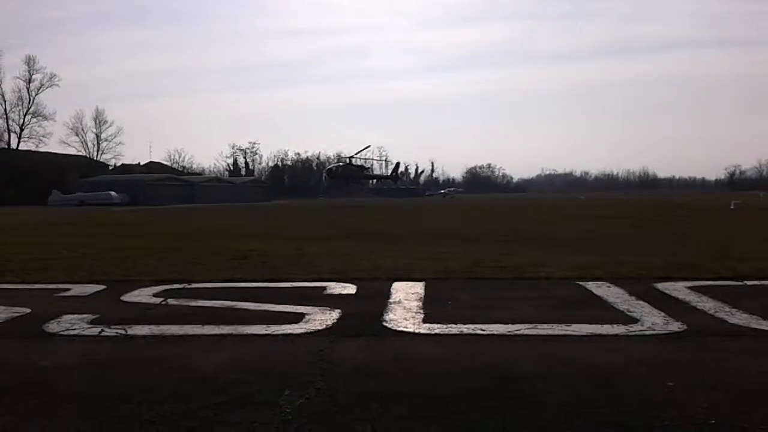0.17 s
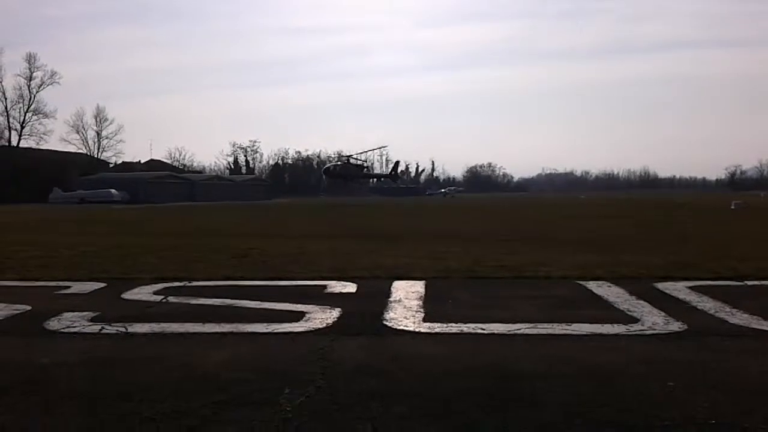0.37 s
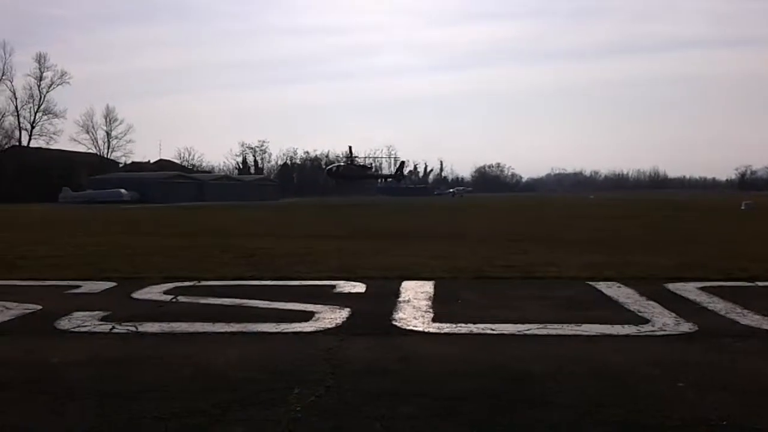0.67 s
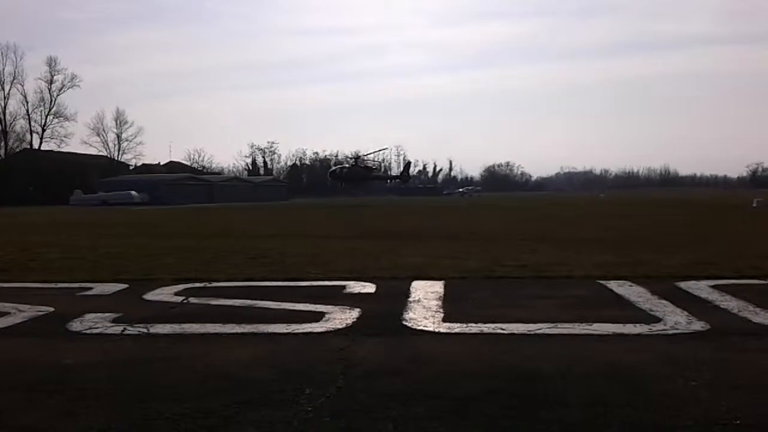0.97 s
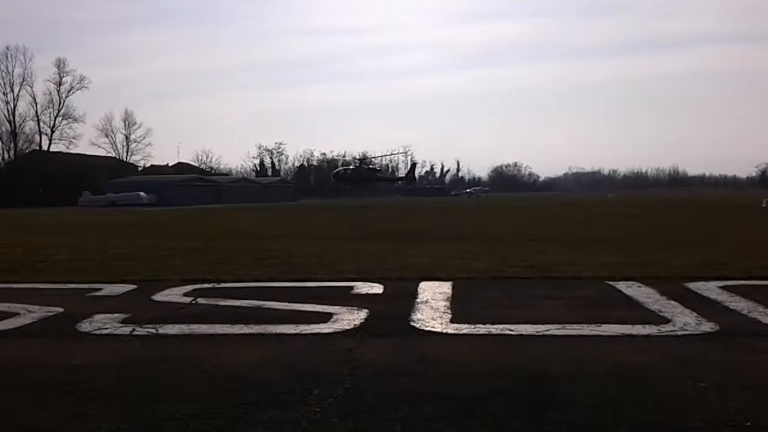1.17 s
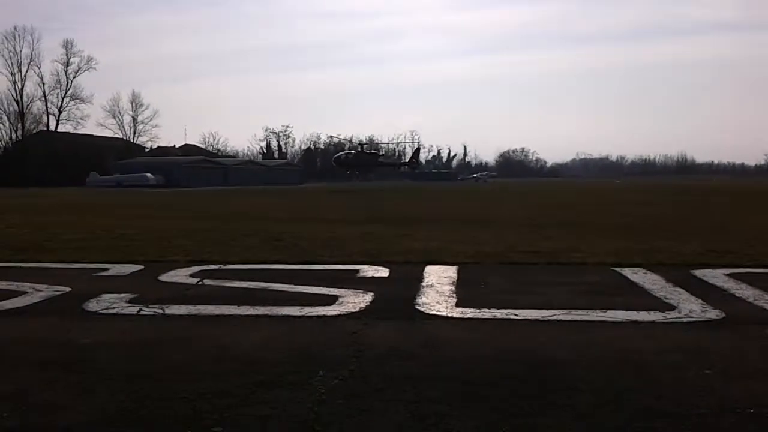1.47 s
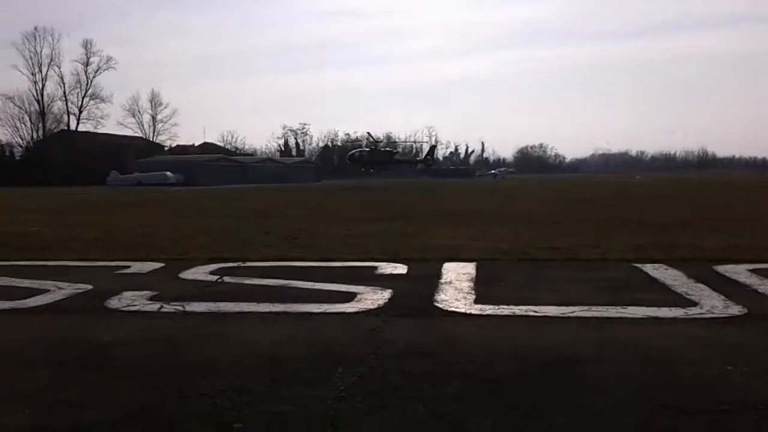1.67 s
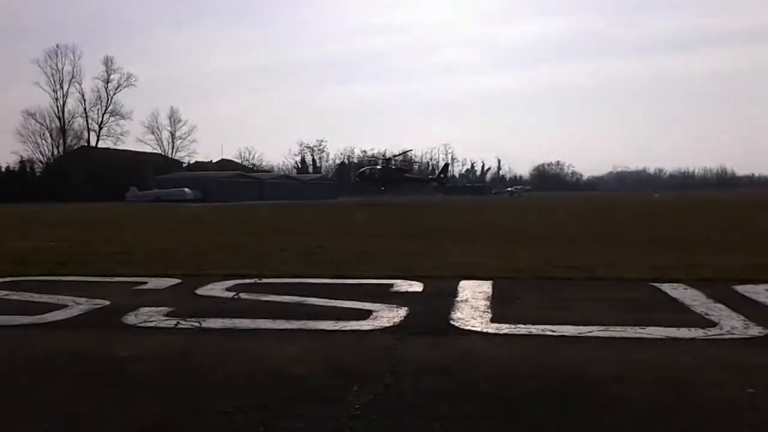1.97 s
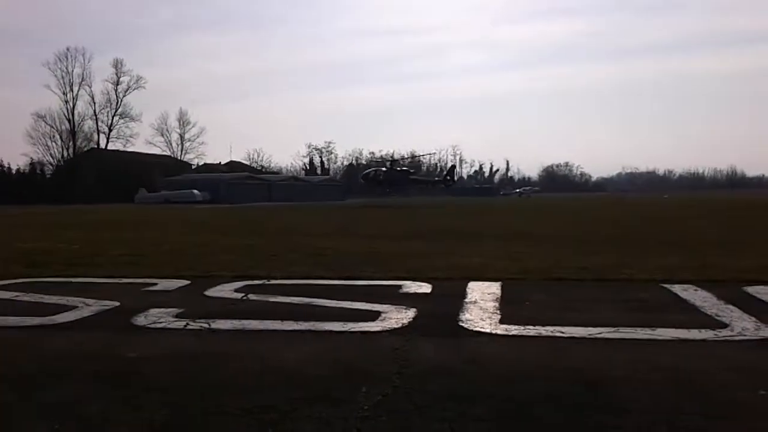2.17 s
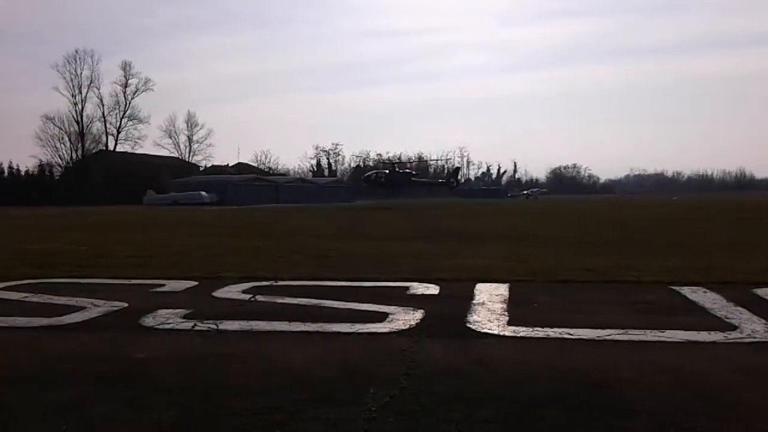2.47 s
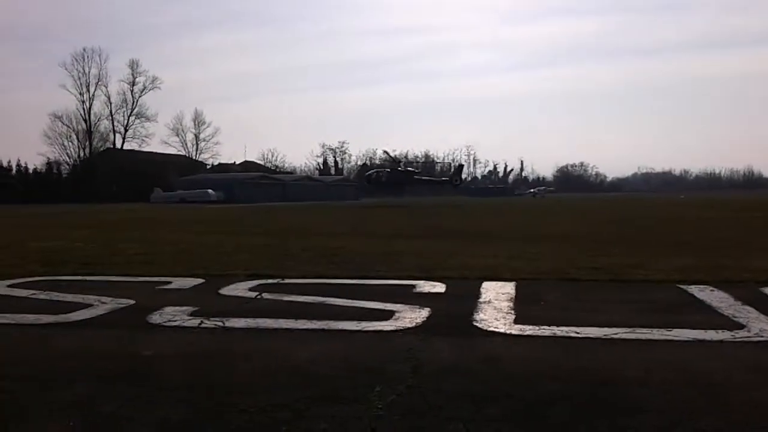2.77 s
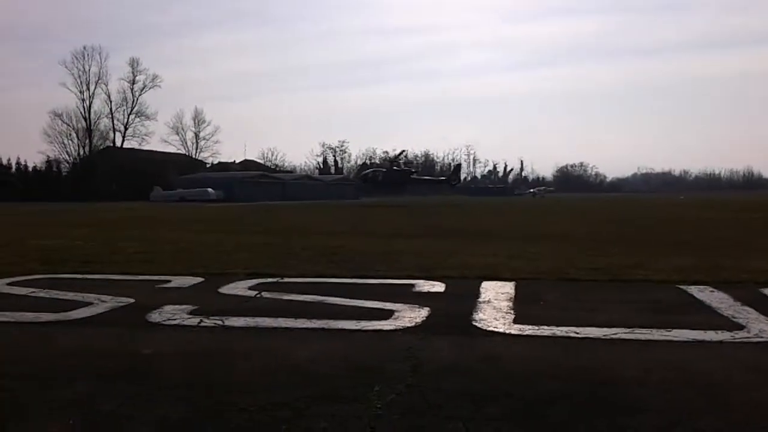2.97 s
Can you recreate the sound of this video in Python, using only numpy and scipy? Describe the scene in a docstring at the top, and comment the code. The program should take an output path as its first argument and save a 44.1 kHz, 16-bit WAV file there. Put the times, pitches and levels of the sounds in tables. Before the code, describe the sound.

A helicopter hovers some way off across an open airfield for about three seconds. A loud, very high turbine whistle flutters throughout, peaking near 1.3 seconds. Beneath it the blades slap and thump rapidly, about twenty times a second, over a steady raspy exhaust roar. Sharper blade cracks come in the first half second, near 1 second and from 2 to 2.4 seconds. The whistle weakens near the end as hiss rises.

```python
"""An open airfield, with a light turbine helicopter hovering low some way off.
The engine's compressor whistles loudly. Air blown down by the rotor makes the whistle flutter,
and the passing blades throw it back at a higher pitch. Each blade thumps, swishes and slaps
through the swirls of air left by the blades before it, over the roar of the exhaust."""
import sys
import numpy as np
from scipy import signal
from scipy.fft import rfft, irfft, next_fast_len
from scipy.io import wavfile
from scipy.ndimage import uniform_filter1d

SR = 44100
rng = np.random.default_rng(int(sys.argv[2]) if len(sys.argv) > 2 else 0)


def generate_wav(signal):
    """Clip the signal to [-1, 1] and save it as 16-bit WAV at the path in sys.argv[1]."""
    frames = np.transpose(np.atleast_2d(signal))
    scaled = np.clip(frames, -1, 1) * 32767
    pcm = np.round(scaled).astype(np.int16)
    wavfile.write(sys.argv[1], SR, pcm)


N = 137151
TIME = np.arange(N) / SR
BLADE_HZ, FIRST_PASS_S = 19.4, .013
BLADE_TIMES = FIRST_PASS_S + np.arange(int(N / SR * BLADE_HZ) + 1) / BLADE_HZ  # when a blade comes round


# Each row: time in seconds, pitch in Hz.
WHISTLE_PITCH = [(0, 7863), (1.0, 7858), (1.7, 7848), (2.45, 7839), (3.11, 7847)]
def compressor_phase():
    """The spinning compressor sets the whistle's phase (its place in the wave); the pitch wavers."""
    return 2 * np.pi * np.cumsum(curve(WHISTLE_PITCH) + 11 * wander(rate_hz=20)) / SR


# Each row: time in seconds, relative level in dB.
WHISTLE_LEVEL = [(0.0, -7.5), (0.03, -14.5), (0.1, -24), (0.12, -17), (0.16, -7), (0.23, -25), (0.27, -9.5),
                 (0.58, -19), (0.62, -4.5), (0.65, -11), (0.68, -9), (0.73, -19.5), (0.84, -17),
                 (0.89, -11.5), (1.05, -16.5), (1.09, -10.5), (1.12, -22.5), (1.19, -13), (1.21, -33),
                 (1.26, -7.5), (1.3, -25.5), (1.32, -3), (1.32, 3), (1.34, -28), (1.37, -15), (1.49, -10.5),
                 (1.59, -16), (1.62, -9), (1.64, -24), (1.68, -5), (1.71, -24), (1.73, -5), (1.78, -28),
                 (1.84, -6), (1.92, -22.5), (1.94, -31), (1.96, -19), (1.99, -29), (2.07, -12.5),
                 (2.23, -15), (2.33, -36), (2.35, -19), (2.41, -7.5), (2.43, -20), (2.53, -8.5),
                 (2.61, -17), (2.62, -10), (2.64, -29), (2.7, -9), (2.8, -27), (2.82, -9), (2.91, -34),
                 (2.96, -45), (2.99, -17), (3.09, -56)]
def whistle(phase):
    """The compressor's note and a faint octave above it flutter in the air the rotor blows down."""
    level_db = curve(WHISTLE_LEVEL)
    note = fluttering_tone(phase, rate_hz=32.2, depth=.39) * undb(level_db - .2)
    octave = fluttering_tone(2 * phase, rate_hz=32.2, depth=.9) * undb(level_db - 34)
    return note + octave


# Each row: frequency in Hz, relative level in dB.
SCATTER_COLOUR = [(7000, -24), (7450, -21.5), (7730, -19), (7850, 8), (8000, -8.5), (8150, -13),
                  (8400, -20), (9000, -38.5)]
def scattered_whistle():
    """Part of the whistle is scattered into a narrow hiss around its pitch."""
    return noise(SCATTER_COLOUR) * undb(-19 + 2 * wander(14))


# Each row: frequency in Hz, relative level in dB.
ECHO_COLOUR = [(7600, -43), (7950, 9), (8100, 1), (8300, -9), (8600, -16), (9000, -19.5), (9500, -34),
               (10300, -65)]
def blade_echoes():
    """Each moving blade throws the whistle back as a short, higher hiss."""
    return noise(ECHO_COLOUR) * blade_swell(delay_s=.021, width_s=.0037) * undb(-26)


# Runs of slaps, one slap per blade. Each row: start and end in seconds, first and last delay after
# the blade in milliseconds, ring level in dB, body level in dB, body pitch in Hz, crackle level in dB.
SLAP_RUNS = [(-.05, 0.273, 2.5, -1.5, -23.5, -24, 380, -23.5), (-.05, 0.183, 12.5, 13, -24, -26, 336, -36),
             (.3, 0.718, -0.5, -1.5, -26, -26.5, 378, -25.5), (0.503, 0.982, 6, 1, -18.5, -16, 340, -23.5),
             (0.937, 1.371, -0.5, -4.5, -14.5, -25, 258, -23),
             (0.485, 0.942, 13.5, 10, -25, -19.5, 229, -28),
             (1.02, 1.363, 11.5, 7.5, -23.5, -25.5, 206, -36), (1.33, 1.606, 10, 7, -34, -18, 288, -44),
             (1.666, 1.86, 5.5, 8, -29, -18.5, 250, -47), (1.9, 2.27, 4.5, 5, -18.5, -18, 360, -21.5),
             (2.26, 2.44, 3.5, 4, -21.5, -24, 360, -21.5), (2.405, 3.144, 8, 5, -21.5, -21, 382, -28),
             (2.568, 3.162, -10, -17, -26, -28, 296, -36), (2.66, 3.096, 19, 13.5, -22, -21, 340, -30)]
# The knocks carry little bass. Each row: frequency in Hz, gain in dB.
KNOCK_BASS_CUT = [(30, -28.5), (90, -7), (170, -3), (3000, -1.5)]
# The tone of crackles and cracks. Each row: frequency in Hz, relative level in dB.
CRACK_COLOUR = [(150, -14), (500, -7), (850, -3), (1300, -1.5), (2500, -6.5), (4200, 3.5), (6000, -12),
                (10000, -43)]
def blade_slaps():
    """A blade cuts swirls of air: a ring, a low body and a crackle, sliding in time as the air shifts."""
    knocks, crackle_level = np.zeros(N), np.zeros(N)
    for start, end, first_ms, last_ms, ring_db, body_db, body_hz, crackle_db in SLAP_RUNS:
        for when, chance in zip(BLADE_TIMES, rng.standard_normal((len(BLADE_TIMES), 4))):
            progress = (when - start) / (end - start)
            if 0 < progress < 1:
                centre = when + (first_ms + progress * (last_ms - first_ms)) / 1000
                near = slice(*np.searchsorted(TIME, [centre - 1 / BLADE_HZ, centre + 1 / BLADE_HZ]))
                age = TIME[near] - centre
                size = np.sin(np.pi * progress) ** .28 * undb(2 * chance[0])  # each run swells and fades
                ring = np.sin(2 * np.pi * 590 * (1 + .028 * chance[1]) * age)
                ring *= burst(age, rise_s=.0022, fall_s=.0033)
                body = np.cos(2 * np.pi * body_hz * (1 + .16 * chance[2]) * age)
                body *= burst(age, rise_s=.002, fall_s=.0022)
                knocks[near] += size * (undb(ring_db) * ring + undb(body_db) * body)
                crackle = burst(age, rise_s=.0008, fall_s=.003)
                crackle_level[near] += size * undb(crackle_db + 2 * chance[3]) * crackle
    return colour(knocks, KNOCK_BASS_CUT) + crackle_level * noise(CRACK_COLOUR)


# Each row: time in seconds, relative strength in dB.
HARD_STRIKES = [(0.0613, -7.5), (0.0722, -14), (0.166, -12), (0.2198, -8.5), (0.4813, -11), (0.631, -22),
                (1.0485, -6.5), (1.5654, -12), (2.0274, -15), (2.1314, -22), (2.1821, -11), (2.236, -12.5),
                (2.2844, -18), (2.335, -10), (2.387, -15.5)]
def blade_cracks(fall_s=.0065):
    """The hardest strikes on the swirling air snap, each with a short noisy tail."""
    when, db = np.array(HARD_STRIKES).T
    snaps = clicks(when, undb(db + 3.5))
    fade = signal.lfilter([1], [1, -np.exp(-1 / (fall_s * SR))], snaps)
    tail = .11 * fade * rng.standard_normal(N)
    return colour(3 * (snaps + tail), CRACK_COLOUR)


# Each row: frequency in Hz, relative level in dB.
THUD_COLOUR = [(30, -33.5), (60, -19), (100, -3), (190, -0.5), (350, 2.5), (600, -7), (850, -2),
               (2000, -42)]
def wake_thuds(swirls=24):
    """Every blade meets nearly the same slowly drifting swirls, so a low thud repeats."""
    at = np.minimum((BLADE_TIMES * SR).astype(int), N - 1)
    hits = np.zeros(N)
    for _ in range(swirls):
        delay_s = .00899 + .00789 * rng.standard_normal() + .00062 * wander(.84)[at]
        hits += clicks(BLADE_TIMES + delay_s, sizes=wander(2.35)[at])
    return undb(-37) * unit(colour(hits, THUD_COLOUR))


# Each row: frequency in Hz, relative level in dB.
SWISH_COLOUR = [(60, -26), (200, -4.5), (600, 3), (850, -11.5), (1200, -2), (2200, -1.5), (4000, 3),
                (6000, -11), (10000, -43)]
def blade_swish():
    """Air tears off each blade as it swings forward."""
    swishes = noise(SWISH_COLOUR) * blade_swell(delay_s=.0081, width_s=.0069)
    return swishes * undb(-40 + 2.53 * wander(5.3))


# Each row: frequency in Hz, relative level in dB.
THUMP_COLOUR = [(20, -28), (38, -16.5), (60, -16.5), (100, 3.5), (160, 4.5), (260, -24)]
def blade_thump():
    """Each blade's lift pushes on the air with a soft, low pulse."""
    pulses = clicks(BLADE_TIMES + .009, np.ones(len(BLADE_TIMES)))
    return undb(-53) * unit(colour(pulses, THUMP_COLOUR))


# The tone of each engine noise. Each row: frequency in Hz, relative level in dB.
ROAR_COLOUR = [(25, -24.5), (60, -8.5), (100, -0.5), (180, 2.5), (380, -5), (650, -3), (880, -16.5),
               (1100, -6.5), (1500, -13), (1800, -6.5), (2100, -10), (2600, -4.5), (3200, -6.5), (4000, -8),
               (5100, -13), (5800, -15.5), (6600, -32.5)]
RASP_COLOUR = [(2500, -16), (3400, -13.5), (3850, 2.5), (4050, -2.5), (4350, -2), (4700, -6.5),
               (5250, -7.5), (5700, -21)]
HISS_COLOUR = [(4500, -17.5), (6000, -13.5), (7000, -3.5), (8800, 1.5), (10000, -9.5), (11600, -19),
               (13000, -15), (14500, -8), (15600, -1), (16000, -27.5)]
# How the roar, rasp and hiss swell and fade, rising where the whistle weakens.
# Each row: time in seconds, relative level in dB.
ROAR_LEVEL = [(0, -36), (.67, -35), (1.48, -39), (1.8, -37.5), (1.95, -32.5), (2.09, -36.5), (2.31, -39.5),
              (2.62, -37), (2.92, -35.5), (3.11, -32)]
RASP_LEVEL = [(0, -31.5), (.3, -31.5), (.6, -30.5), (.77, -25.5), (.95, -31), (1.3, -32), (1.55, -33),
              (1.8, -32), (1.97, -26.5), (2.15, -30), (2.52, -34), (2.85, -27), (3.11, -29)]
HISS_LEVEL = [(0, -51), (.7, -52), (2.7, -56.5), (2.78, -51), (3.11, -46)]
def exhaust_and_intake():
    """Gas leaves the exhaust pipe with a roar and a bright rasp, while the air intake hisses."""
    roar = noise(ROAR_COLOUR) * undb(curve(ROAR_LEVEL) + 3 + 1.2 * wander(25))
    rasp = noise(RASP_COLOUR) * undb(curve(RASP_LEVEL) - .5 + wander(17))
    hiss = noise(HISS_COLOUR) * undb(curve(HISS_LEVEL) + 11.5 + .8 * wander(15))
    return roar + rasp + hiss


# Each row: multiple of the shaft's turning rate, level in dB.
SHAFT_TONES = [(5, -43.5), (7, -43.5), (8, -52.5), (9, -57), (10, -44), (12, -56), (13, -54), (14, -51),
               (16, -69)]
# Each row: pitch in Hz, level in dB.
GEAR_TONES = [(1281, -50), (1705, -55), (2562, -56), (2853, -49.5), (3844, -51.5)]
def shaft_and_gears(phase, compressor_blades=11):
    """The engine shaft, which turns with the compressor, and the gearbox add faint tones."""
    tones = [(multiple * phase / compressor_blades, db) for multiple, db in SHAFT_TONES]
    tones += [(2 * np.pi * hz * TIME, db) for hz, db in GEAR_TONES]
    return sum(undb(db) * fluttering_tone(angle, rate_hz=6, depth=.6) for angle, db in tones)


# Each row: frequency in Hz, gain in dB.
GROUND_DIPS = [(20, -1), (720, 0), (800, 0), (870, -10), (980, 0), (5300, 0), (5850, -4), (6300, -1),
               (6900, -11), (7500, 1), (16000, 1)]
def ground_bounce(sound):
    """Sound bouncing off the ground cancels some frequencies of the direct sound."""
    return colour(sound, GROUND_DIPS)


def undb(db):
    """Turn decibels into a number to multiply by."""
    return 10 ** (np.asarray(db) / 20)


def unit(x):
    """Scale to an average (rms) level of 1."""
    return x / np.sqrt(np.mean(x ** 2) + 1e-18)


def curve(rows):
    """Join (seconds, value) rows with straight lines and rounded corners."""
    return uniform_filter1d(np.interp(TIME, *np.array(rows, float).T), size=400)


def colour(x, points):
    """Shape the tone by (Hz, dB) points, cutting steeply outside them."""
    hz, db = np.array(points, float).T
    size = next_fast_len(2 * N)
    log_hz = np.log(np.maximum(np.arange(size // 2 + 1) * SR / size, 1))
    outside = np.maximum(np.log(hz[0]) - log_hz, 0) + np.maximum(log_hz - np.log(hz[-1]), 0)
    gain = undb(np.interp(log_hz, np.log(hz), db) - 80 * outside)
    return irfft(rfft(x, size) * gain, size)[:N]


def noise(points):
    """Noise shaped by (Hz, dB) points, at level 1."""
    return unit(colour(rng.standard_normal(N), points))


def wander(rate_hz):
    """A smooth random drift, about 1 in size."""
    hz = np.arange(N // 2 + 1) * SR / N
    return unit(irfft(rfft(rng.standard_normal(N)) / (1 + (hz / rate_hz) ** 2), N))


def clicks(times, sizes):
    """Single clicks at the given times in seconds."""
    at = np.round(times * SR).astype(int)
    inside = (at >= 0) & (at < N)
    return np.bincount(at[inside], sizes[inside], N)


def burst(age, rise_s, fall_s):
    """A quick rise up to age 0, then a fade."""
    return np.where(age < 0, np.exp(-(age / rise_s) ** 2), np.exp(-abs(age) / fall_s))


def blade_swell(delay_s, width_s):
    """One smooth swell per passing blade."""
    passes = (TIME - FIRST_PASS_S - delay_s) * BLADE_HZ
    from_peak_s = ((passes + .5) % 1 - .5) / BLADE_HZ
    return unit(np.exp(-.5 * (from_peak_s / width_s) ** 2))


def fluttering_tone(phase, rate_hz, depth):
    """A tone mixes with copies of itself that moving air shifts in pitch by up to about rate_hz."""
    shift = np.arange(N // 2 + 1) * SR / N / rate_hz
    spread = (.4 + shift) / (1 + shift ** 2) ** 1.5
    real, imag = (unit(irfft(rfft(rng.standard_normal(N)) * spread, N)) for _ in range(2))
    flutter = 1 + depth * (real + 1j * imag)
    return unit((np.exp(1j * phase) * flutter).real)


def scene():
    """Rotor and engine heard across the grass, in one channel."""
    rotor = blade_slaps() + wake_thuds() + blade_cracks() + blade_swish() + blade_thump()
    rotor_and_roar = ground_bounce(rotor + exhaust_and_intake())
    phase = compressor_phase()
    turbine = whistle(phase) + scattered_whistle() + blade_echoes() + shaft_and_gears(phase)
    return (turbine + rotor_and_roar)[None]


def record(dry, limit=.38, top_hz=15900):
    """Hold down the loudest swells and cut the highest treble."""
    level = np.sqrt(np.maximum(uniform_filter1d(dry ** 2, size=220), 0))
    held = dry / (1 + (level / limit) ** 4) ** (1 / 4)
    return signal.sosfilt(signal.ellip(10, .2, 80, top_hz, fs=SR, output="sos"), held)


dry = scene()
out = record(dry)
generate_wav(out)
```